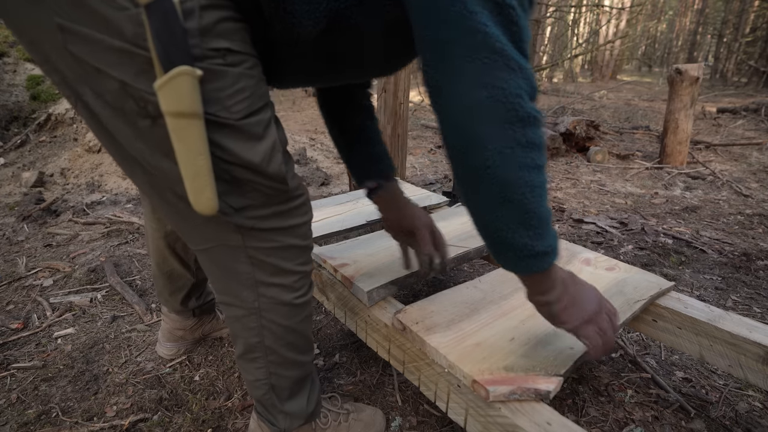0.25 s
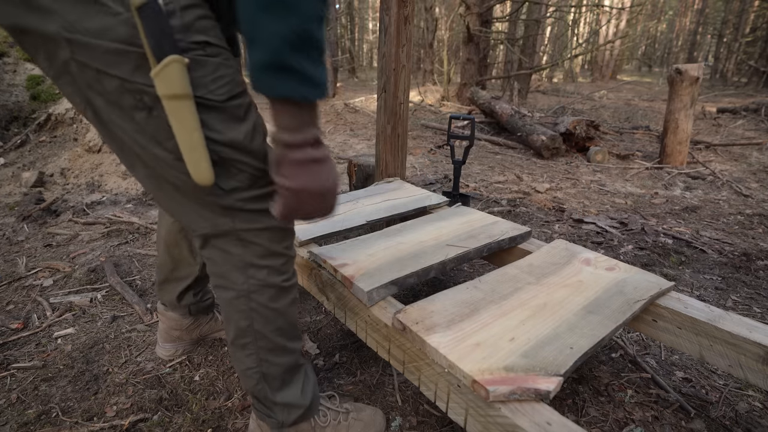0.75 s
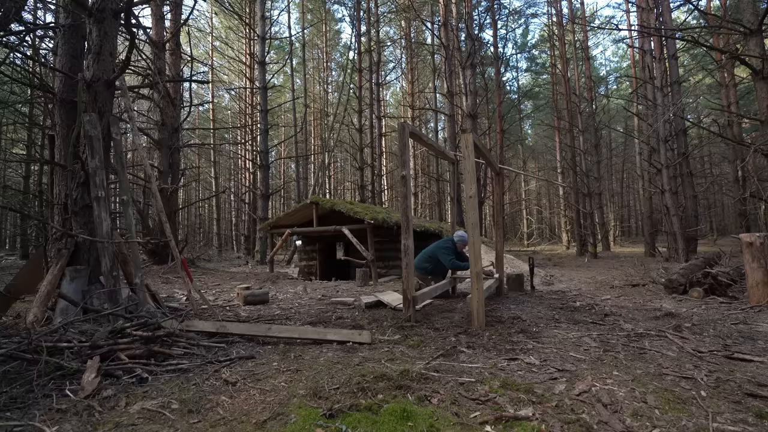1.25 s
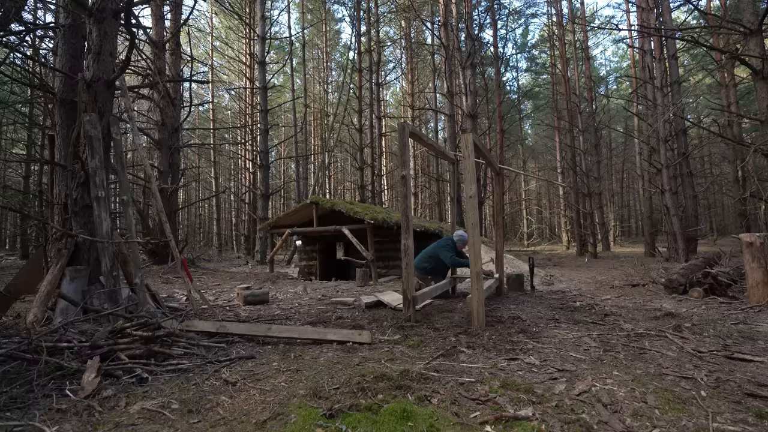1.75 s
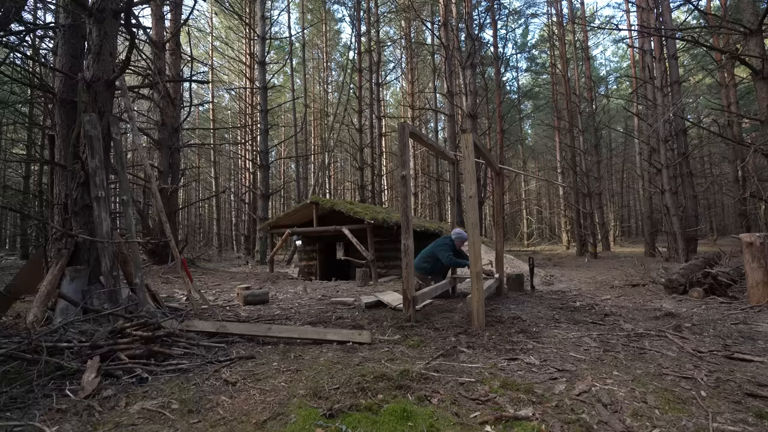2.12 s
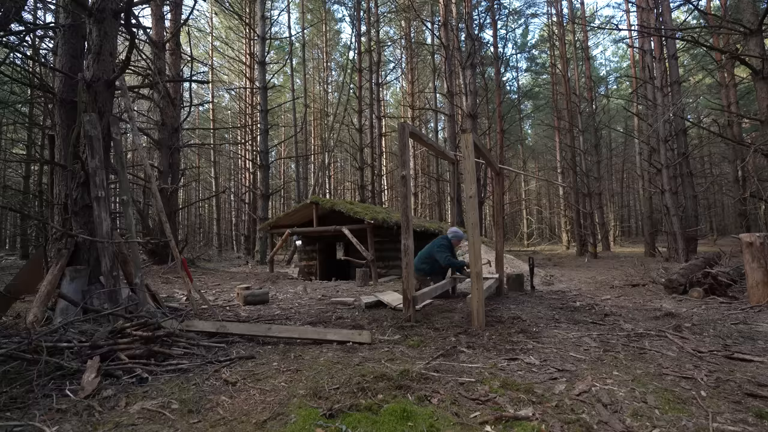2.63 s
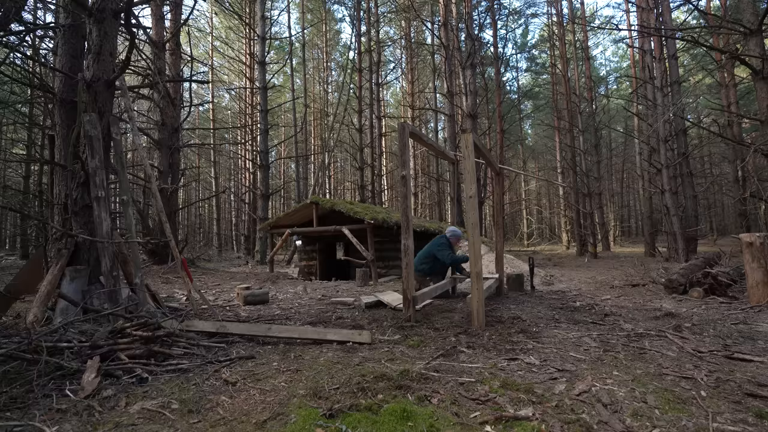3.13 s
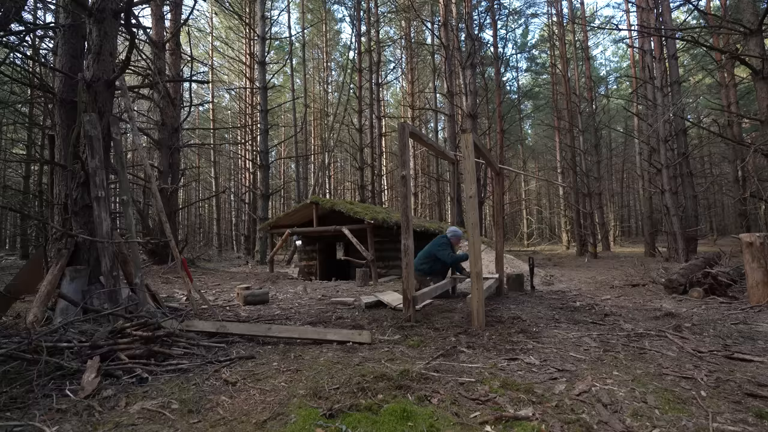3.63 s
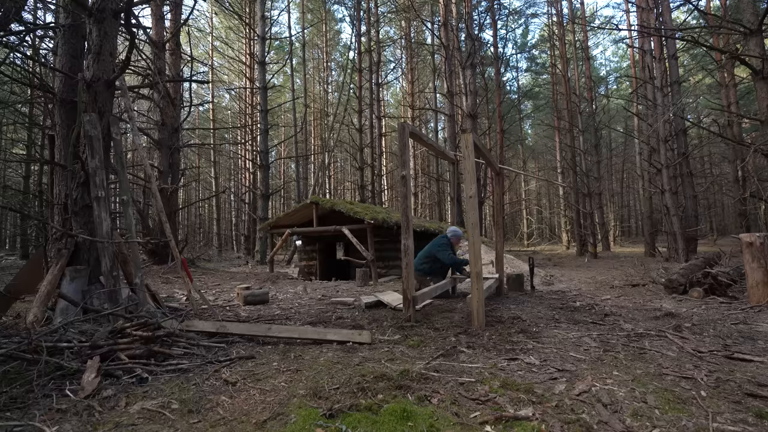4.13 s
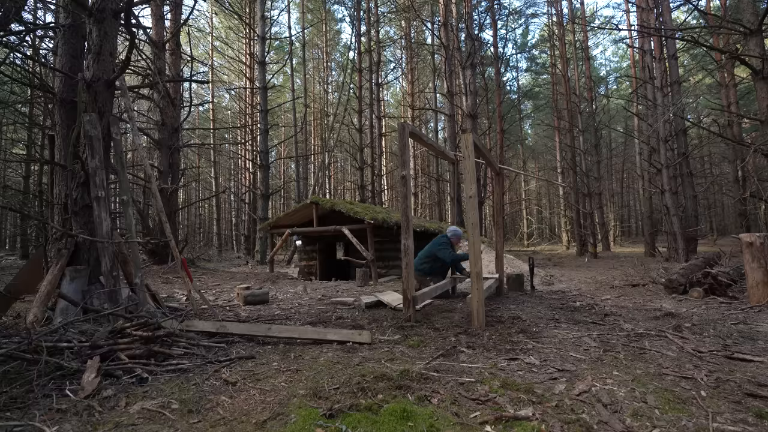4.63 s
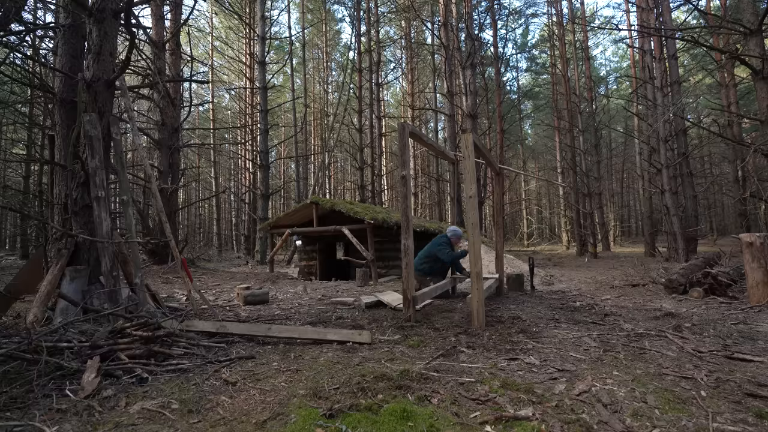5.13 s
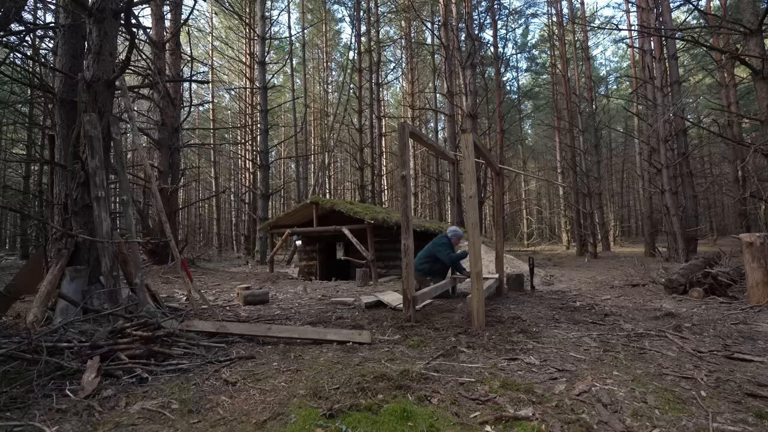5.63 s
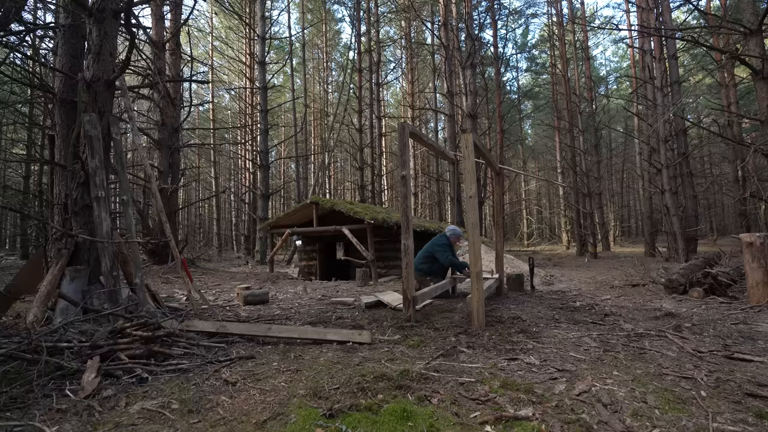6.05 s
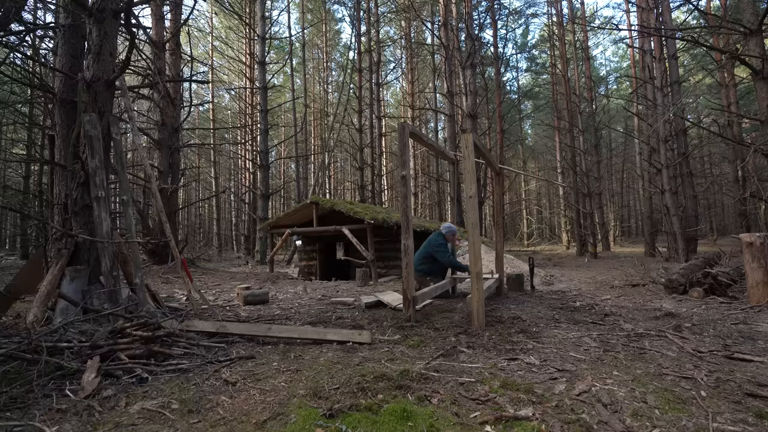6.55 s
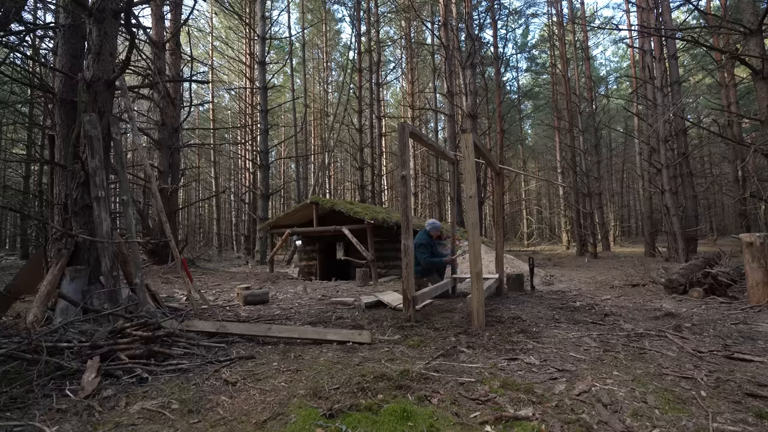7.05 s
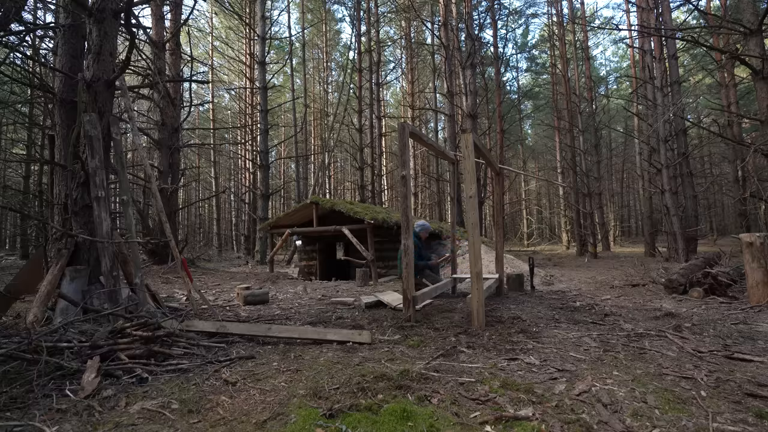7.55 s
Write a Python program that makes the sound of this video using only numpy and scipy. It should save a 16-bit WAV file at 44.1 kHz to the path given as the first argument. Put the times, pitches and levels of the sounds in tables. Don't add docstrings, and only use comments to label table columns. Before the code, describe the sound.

Hands nudge split boards on a wooden frame, then a steel hammer cracks out spaced blows, each echoing off trunks with a faint metallic ring.

```python
import sys
import numpy as np
from scipy import signal
from scipy.fft import rfft, irfft, next_fast_len
from scipy.io import wavfile
from scipy.ndimage import uniform_filter1d, map_coordinates

SR = 44100
rng = np.random.default_rng(int(sys.argv[2]) if len(sys.argv) > 2 else 0)


def digitize_waveform(pressure):
    field = np.atleast_2d(pressure).T
    bounded = np.clip(field, -1, 1)
    quanta = np.round(bounded * 32767).astype(np.int16)
    wavfile.write(sys.argv[1], SR, quanta)


def attenuation_scalar(level_db):
    decades = np.asarray(level_db, float) / 20
    return 10 ** decades


N = 343087

# time_s, buffet_db
WIND = [
    [(0, -63), (.25, -67), (.65, -66.5), (1.222, -68)],
    [(1.23, -49), (1.74, -44.5), (1.85, -56), (3.55, -59), (3.58, -53), (4.09, -70), (4.15, -61),
     (4.42, -69), (4.55, -55), (4.91, -71), (5.04, -53), (5.46, -66), (5.55, -55), (5.83, -62.5),
     (6.74, -51.5), (6.87, -59), (7.47, -52), (7.78, -56)],
]
# freq_hz, density_db_per_hz
RUMBLE = [(12, -32), (20, -2), (70, -4.5), (82, -15.5), (105, -20.5), (200, -44), (260, -78), (440, -120)]
# freq_hz, density_db_per_hz
AIR = [(41, -33), (70, -10.5), (300, -8), (641, -15), (1050, -22), (1730, -27), (3050, -27.5), (15700, -29),
       (15900, -70)]
AIR_DB = -60.5

# time_s, busy_db
RUSTLE = [(0, -22), (.26, -6), (.37, -2), (.52, -2), (.66, -0.5), (1.1, -.5), (1.225, -1)]
# time_s, scrape_db, sleeve_db, spread_s
NUDGES = [
    (0, -71, -98, 0.017),
    (.108, -61, -58.5, 0.043),
    (.282, -53, -62, 0.0055),
    (.68, -65, -73, 0.028),
    (.855, -57, -76, 0.014),
    (1.0, -63, -70, 0.01),
    (1.118, -55, -62, 0.0088),
    (1.187, -49, -56, 0.0011),
    (1.2, -64, -66, 0.002),
    (1.222, -50, -53, 0.0006),
]
# freq_hz, density_db_per_hz
SCRAPE = [(88, -26), (130, -5.5), (284, -16), (361, -9), (563, -4), (2000, -16.5), (2600, -47),
          (4400, -120)]
# freq_hz, density_db_per_hz
SLEEVE = [(710, -22), (1200, -5), (2570, -5), (4430, -6), (7650, -12.5), (14100, -15.5), (15500, -18)]
CLOSE_END_S = 1.2232
SCRAPE_DB, SLEEVE_DB = -56.5, -58.5
SCRAPE_FOLLOWS, SLEEVE_FOLLOWS = 3.2, 0.51

# start_s, peak_db, pitch_hz, t60_s
TICKS = [(.0634, -47.5, 5000, .01), (1.0546, -48, 4500, .01), (.0972, -52, 1550, .012),
         (.2793, -45, 1900, .014), (.821, -52, 1000, .012), (.842, -50, 1300, .012),
         (1.136, -42, 3500, 0.017), (1.1842, -50, 4800, .008), (1.2211, -56, 2500, .006),
         (1.7255, -24, 3400, .008), (1.7258, -29, 7000, 0.0065), (5.4955, -19, 8900, 0.0055),
         (1.1985, -45, 6000, .015), (1.7655, -50, 11000, .008), (1.7805, -50, 9000, .006),
         (1.9007, -50, 4520, 0.0072), (2.5462, -51, 4500, .006), (2.7348, -52, 4600, .006),
         (2.749, -56, 4200, .006), (3.4317, -56, 4200, .02), (5.3195, -46, 4500, .006),
         (5.335, -49, 4800, .006), (5.4896, -37, 5540, .006), (5.5285, -42, 11930, .008),
         (6.0015, -29, 6000, 0.0044), (7.7203, -45, 2900, .007), (7.7208, -43, 1400, .008),
         (7.7205, -62, 8500, .006), (7.7529, -55, 8300, .01)]
# start_s, peak_db, pitch_hz, t60_s, puff_db
TAPS = [
    (0.279, -50, 574, 0.034, 5),
    (0.844, -48, 555, 0.041, 10),
    (1.115, -41, 700, 0.03, -1),
    (1.123, -44, 800, 0.025, -4),
    (1.1945, -28, 672, 0.021, -19),
    (1.197, -37.5, 210, 0.047, -12),
    (2.108, -32.5, 960, 0.035, -9),
    (2.141, -29.5, 1480, 0.047, -26),
    (7.503, -45, 530, 0.031, -11),
    (7.603, -65, 439, 0.035, 2),
]
# start_s, peak_db, pitch_hz, t60_s, puff_db
REBOUND = [
    (2.681, -24, 338, 0.018, -13),
    (2.6824, -30.5, 2110, 0.012, -14),
    (5.529, -15, 1870, 0.034, -23),
    (5.529, -11, 1600, 0.017, -31),
    (5.529, -17, 1310, 0.023, -25),
    (5.529, -16, 1110, 0.029, -24),
]
# start_s, peak_db, pitch_hz, t60_s, puff_db
PINGS = [(1.741, -50, 15300, 0.04, -40), (1.7655, -47, 15700, .05, -30), (1.7805, -47, 15600, .09, -30),
         (1.7805, -55, 8000, .07, -40), (2.06, -58, 15600, .11, -40)]
# start_s, peak_db, pitch_hz, t60_s, puff_db
THUMPS = [(2.037, -27, 604, 0.068, -30), (3.05, -27.5, 192, .1, -30), (3.05, -30.5, 313, 0.096, -30),
          (4.132, -26.5, 417, 0.11, -30), (4.131, -32, 492, .06, -30), (3.0505, -26, 1070, 0.066, -30),
          (6.601, -23, 465, 0.098, -30), (1.728, -23, 900, .05, -30), (4.52, -26, 1150, .04, -30),
          (4.52, -28, 225, .1, -30), (6.602, -30, 267, .08, -30), (5.535, -42, 1860, .35, -30),
          (6.02, -50, 2450, .4, -30), (4.52, -28, 760, 0.056, -30), (6.012, -33, 276, 0.069, -30)]

# start_s, first_touch_lead_s
STRIKES = [(1.7248, .002), (2.0345, .004), (2.6864, .005), (3.0469, .004), (4.1283, .003), (4.5156, .004),
           (4.9817, .004), (5.4946, .0045), (6.0058, .0045), (6.5984, .0045)]
# crack_db, touch_db, touch_brightness_hz, ground_bounce_db
BLOWS = [
    (-9.5, -42, 1300, -6.5),
    (-6, -26, 860, -2.5),
    (-33.5, -47, 3100, -18),
    (-6, -36, 1300, -2.5),
    (-2.5, -41, 1100, -3),
    (-2.5, -24.5, 1250, -8),
    (-9, -23.5, 2200, 2.5),
    (-8.5, -30, 4200, -3),
    (-14.5, -27.5, 4400, -1.5),
    (-11, -18, 4000, -2.5),
]
# body_db, clack_db, bite_db, edge_db
FACE = [(1, 6, -0.5, 5.5), (6.5, -2.5, 0.5, -4), (-6, 0, 3, -15), (5, -9, -2, 3), (-6.5, -8, -8, -15),
        (5, 1.5, 4.5, 13), (-8, 1, 6.5, 17), (-16, -4, 12.5, 11), (3, 2, 19, 25), (-1, -0.5, 8.5, 13.5)]
BODY_HZ, CLACK_HZ, BITE_HZ, EDGE_HZ = 1550, 2440, 6660, 10650
# pitch_hz, level_db
NAIL = [(8420, 14.5), (2060, 8), (5800, 13), (2800, 15), (2770, 16.5), (3000, 6.5), (6900, 9.5),
        (4110, 11.5), (6940, 3.5), (3040, 12.5)]
# freq_hz, level_db
STEEL = [(200, -6), (800, -28), (1400, 6), (3000, 4.5), (4500, 6.5), (7000, -1.5), (9500, -1), (15500, -13)]
# chatter_db, chatter_s, post_delay_s, post_db
AFTER = [(-18, 0.0037, 0.012, -21), (-16.5, 0.0037, 0.013, -24), (-21, .004, .012, -30),
         (-24.5, 0.009, 0.0085, -29), (-24, 0.0058, .012, -22), (-25, 0.0047, .011, -28),
         (-25, 0.004, 0.013, -21), (-25, 0.0042, .0115, -26), (-29, 0.0067, 0.0113, -17),
         (-18, 0.0056, 0.01, -27)]
BOUNCE_HZ = 5000

# pitch_hz, level_db, t60_s
WOOD = [(175.2, -12.5, 0.19), (220, -2, 0.13), (232.3, 0.5, 0.14), (276.4, -11.5, 0.32), (341, 0, 0.21),
        (433, -5.5, 0.097), (498.2, -3, 0.099), (615, -32.5, 0.048), (675, -14, 0.15), (749, 10.5, 0.028),
        (839, 5, 0.055), (1055, -0.5, 0.064), (1087, 6.5, 0.039), (1216, -7, 0.066)]
# knock_db, tilt_db_per_octave, spot_along_board (0-1), main_mode_db
KNOCKS = [(-23, 0.5, 0.14, 3), (-27.5, -1, 0.19, 2.5), (-51.5, -3, 0.33, -1), (-29.5, 4, 0.5, -13),
          (-26, -2.5, 0.3, -2), (-26.5, 1, .5, -18), (-28, 1.5, 0.28, -2), (-30, 4, 0.14, 9.5),
          (-34, -1.5, .33, -16), (-26, 3.5, 0.22, -3)]
BASS = [-1.5, -2, -4, 0, -5, 2, 0.5, 0, -1.5, -1]
# level_db, pitch_hz, t60_s, rail_hum_db
POLES = [(-45, 43, .5, 2), (-40, 89, 0.42, 5), (-55, 140, 0.36, -5), (-44, 140, .5, -4),
         (-50, 190, 0.54, -1), (-48, 61, 0.45, -1), (-36.5, 120, 0.43, -5), (-39.5, 138, 0.58, 7.5),
         (-34, 139, 0.55, -0.5), (-32.5, 139, 0.42, -4)]
# pitch_hz, level_re_pole_db, t60_s
RAILS = [(338.5, -12, 0.24), (496, -11.5, 0.61), (698, -18, 1.17), (914, -11.5, 0.36), (1078, -13.5, 0.43)]
MAIN_MODE = 4
SPOT_DB = 3.5

# pole_db, board_db, steel_db, treble_shadow_db, treble_limit_hz
ECHOES = [(-32, -49, -57, 0, 16500), (-41, -44, -41.5, -6, 9300), (-64, -86, -71, -2, 9900),
          (-45.5, -43.5, -46, -7, 9800), (-40.5, -55, -45.5, -21, 11000), (-44.5, -38, -36.5, -3, 13500),
          (-42, -40, -37.5, -4.5, 16500), (-40.5, -47, -47, 3, 9400), (-40, -52, -45.5, -2, 18000),
          (-38.5, -38, -38.5, -2, 8600)]
SHELF = [-16, -16, -40, -25, -30, -16, -30, -5.5, -16, -4]
# pitch_hz, level_db, overtone_hz, overtone_db
CLANGS = [(4000, 11, 8500, 6), (4250, -1, 9500, 3.5), (5000, 0, 9000, 0), (4800, 6.5, 10700, 15.5),
          (4930, 5, 8400, 20), (5000, 0.5, 14000, 0.5), (6450, 2, 11500, 3), (4240, 13, 8300, 10.5),
          (7000, 11.5, 13800, 11), (5000, -1, 16000, 0)]
SHADE_HZ = 5450
CLANG_WIDE = 0.35
# freq_hz, level_db_per_octave
POLE_ECHO = [(40, -43), (110, 0), (240, -12.5), (450, -17), (900, -21), (2000, -60)]
# freq_hz, level_db_per_octave
BOARD_ECHO = [(100, -43), (200, -9), (450, -8), (1000, 1), (2200, -4.5), (4000, -3), (8000, -50)]
# freq_hz, level_db_per_octave
STEEL_ECHO = [(500, -50), (1000, -32), (2200, -10), (3200, -3), (4300, 0), (5300, -0.5), (8500, 0.5),
              (16500, -3.5)]
# pitch_hz, width_hz, level_db
BOARD = [(342, 90, 3), (474, 22, 4.5), (677, 100, 0), (880, 36, -1), (1095, 17, -1), (1427, 18, 6),
         (1830, 190, 0), (2380, 47, 3), (2850, 230, 3.5)]
# pitch_hz, level_db, second_hz, second_db
VOICE = [(700, 1, 1800, -5.5), (700, -0.5, 1800, 1.5), (700, 0, 2000, 0), (760, 1, 2300, -2),
         (700, 3, 1900, 0), (800, -2, 1600, 2.5), (1080, 3.5, 2100, 1.5), (700, 1, 1860, 7.5),
         (1290, 0, 2200, 4), (910, -3.5, 2200, 3.5)]
# pitch_hz, level_db, second_hz, second_db
LINGER = [(950, 3, 1250, 3), (335, 6, 2360, 5), (330, 5, 800, 3), (600, 3.5, 800, 1.5), (1060, 4, 1150, 3),
          (1054, 5.5, 800, 4.5), (1860, 6, 680, 3), (1350, 5, 500, 2), (1150, 3, 820, 6), (1150, 5, 650, 6)]
LINGER_WIDE_HZ = 34.3
# freq_hz, t60_s
FOREST = [(140, 0.52), (400, 0.56), (1000, 0.78), (2200, 0.9), (4300, 0.61), (8500, 0.38), (12000, 0.3),
          (15500, 0.25)]
# freq_hz, build_s
SWELL = [(150, 0.021), (1000, 0.028), (2500, 0.1), (5000, 0.079), (9000, 0.084), (15000, 0.061)]
# freq_hz, share (0-1)
GAP = [(500, 1), (1300, 0.62), (3000, 0.64), (7000, 0.88), (14000, 0.89)]
# freq_hz, level_db
FAR = [(140, -61), (500, -6), (1300, -14), (2200, -18), (3200, -22), (6000, -27)]
DEEP = [0, 1, 0, 1, -0.5, 1, 0, -1, 1, 2.5]
REACH = [0.51, 0.91, .8, 0.91, 0.71, 1.01, 1.005, 0.94, 1.02, 0.99]

# blow_s, peak_db, crest_delay_s, fall_db_per_s, flutter_per_s
HEAD = [
    (1.7248, -67.5, 0.089, 25, 1.3),
    (2.0345, -49.5, 0.15, 30, 10.5),
    (3.0469, -64, 0.16, 20, 14),
    (4.1283, -72.5, 0.18, 69, 11),
    (4.5156, -48.5, .14, 42, 10.7),
    (4.9817, -46.5, 0.14, 37, 8.7),
    (5.496, -43, 0.12, 30, 9.7),
    (6.0058, -57.5, 0.12, 23.5, 9),
    (6.5984, -55.5, 0.12, 37, 17.5),
]
SWING = [6, 3, 3, 8, 22, 24, 28, 16, 12]
EARLY = [0.59, 0.2, 0.51, 0.52, 0.086, 0.14, 0.15, .2, .3]
# flutter_s, stifled_by_hand_after_s
HUSH = [(0.27, 0.25), (0.22, 0.31), (0.24, 0.46), (.3, .3), (0.35, 0.39), (0.27, 0.41), (0.23, 0.33),
        (0.24, 0.48), (0.27, 0.29)]
# time_s, level_db, spread_s
SHIMMER = [(1.794, -6, .02), (1.854, -5, .015), (2.516, -3, .015), (2.65, -12, .01), (2.76, -11, .03),
           (2.9, -8, .03), (3.101, 8, 0.018), (3.179, -6, .01), (3.243, -9, .01), (3.295, -6, .012),
           (4.167, 7, .02), (4.584, -8, .02), (4.61, 9, .015), (4.753, -9, .012), (4.777, 4.5, .012),
           (5.068, 6, .012), (5.22, -2, 0.0089), (5.24, -6, 0.0074), (5.27, 3, .015), (5.709, -8, .01),
           (5.74, 0, 0.0066), (5.986, -7, .012), (6.078, 8, .012), (6.216, -7, .007), (6.284, -9, .018),
           (6.739, -10, .012), (6.797, -2, .011), (6.87, 5, 0.017), (6.95, -6, .011), (6.996, -6, 0.014),
           (7.048, 6, .02)]
HEAD_HZ, SING_RISE_S, LIFT_S, FLUTTER = 7393, 0.099, 0.4, 0.75
STIFLE_DB_PER_S, STIFLE_S = 70, 0.087

# freq_hz, density_db_per_hz
HISS = [(100, -5), (8000, -7), (15700, -7), (15900, -78)]
HISS_DB = -67.5
# freq_hz, level_db
TOP_END = [(15750, 0), (15950, -14), (16500, -24), (16950, -34), (17050, -90)]


def unit(x):
    return x / np.sqrt(np.mean(x ** 2) + 1e-20)


def along(points, hz):
    f, v = np.transpose(points)
    return np.interp(np.log(hz + 1), np.log(f + 1), v)


def curve(points):
    s, v = np.transpose(points)
    return np.interp(np.arange(N) / SR, s, v)


def wobble(rate):
    return map_coordinates(rng.standard_normal(int(N * rate / SR) + 4), [np.arange(N) * rate / SR])


def filtered(x, response):
    m = 2 * next_fast_len(x.shape[-1] // 2 + 2048)
    return irfft(rfft(x, m) * response(np.fft.rfftfreq(m, 1 / SR)), m)[..., :x.shape[-1]]


def lowpass(hz, corner):
    return 1 / (1 + 1j * hz / corner)


def highpass(hz, corner):
    return 1j * hz / (corner + 1j * hz)


def resonance(hz, centre, half_width):
    return 1 / (1 + ((hz - centre) / half_width) ** 2)


def causal(gain):
    cepstrum = irfft(np.log(gain + 1e-6))
    cepstrum[1:len(cepstrum) // 2] *= 2
    cepstrum[len(cepstrum) // 2 + 1:] = 0
    return np.exp(rfft(cepstrum))


def decay(t, t60):
    return attenuation_scalar(-60 * t / t60)


def build_up(t, tau):
    return 1 - np.exp(-t / tau)


def sine(hz, t, phase=0):
    return np.sin(2 * np.pi * hz * t + phase)


def rush(spectrum):
    return unit(filtered(rng.standard_normal(N), lambda hz: attenuation_scalar(along(spectrum, hz))))


def burst(t, hold, t60, spiky=1):
    shape = (t >= 0) * decay(np.maximum(t - hold, 0), t60)
    noise = rng.standard_normal(len(t))
    noise = shape * np.sign(noise) * np.abs(noise) ** spiky
    return noise * np.linalg.norm(shape) / np.linalg.norm(noise)


def add(track, s, sound):
    part = track[round(s * SR):][:len(sound)]
    part += sound[:len(part)]


def air():
    puffs = rush(RUMBLE)
    puffs = puffs / np.sqrt(np.abs(uniform_filter1d(puffs ** 2, size=SR // 6)) + .05)
    treetops = attenuation_scalar(AIR_DB + 0.36 * wobble(3.1)) * rush(AIR)
    return treetops + attenuation_scalar(curve(WIND[0] + WIND[1]) + 1.2 * wobble(10)) * puffs


def rustle():
    track, t = np.zeros(N), np.arange(round(CLOSE_END_S * SR)) / SR
    busy_db = curve(RUSTLE)[:len(t)]
    scrape = attenuation_scalar(SCRAPE_DB + SCRAPE_FOLLOWS * busy_db)
    sleeve = attenuation_scalar(SLEEVE_DB + SLEEVE_FOLLOWS * busy_db)
    for s, scrape_db, sleeve_db, spread in NUDGES:
        bump = np.exp(-((t - s) / spread) ** 2)
        scrape = scrape + attenuation_scalar(scrape_db) * bump
        sleeve = sleeve + attenuation_scalar(sleeve_db) * bump
    boards = attenuation_scalar(1.5 * wobble(25) + 1.6 * wobble(110)) * rush(SCRAPE)
    cloth = attenuation_scalar(0.69 * wobble(68.4)) * rush(SLEEVE)
    add(track, 0, scrape * boards[:len(t)] + sleeve * cloth[:len(t)])
    return track


def ticks():
    track, t = np.zeros(N), np.arange(SR // 40) / SR
    for s, db, hz, t60 in TICKS:
        band = lambda f: 1j * f * 0.61 * hz / (hz * hz - f * f + 1j * f * 0.51 * hz)
        add(track, s, attenuation_scalar(db + 3.5) * filtered(burst(t, 0.00033, t60), band))
    return track


def taps():
    track, t = np.zeros(N), np.arange(SR // 8) / SR
    for s, db, hz, t60, puff_db in [*TAPS, *REBOUND, *PINGS, *THUMPS]:
        ring = sine(hz, t) * decay(t, t60) * build_up(t, 0.0031)
        puff = filtered(burst(t, 0.00033, t60 * .5), lambda f: highpass(f, hz) * lowpass(f, 3 * hz))
        add(track, s, attenuation_scalar(db) * (ring + attenuation_scalar(puff_db) * puff))
    return track


def first_touch(lead, db, corner):
    t = np.arange(SR // 40) / SR
    dull = filtered(burst(t, lead, 0.012), lambda hz: highpass(hz, 400) * lowpass(hz, corner) ** 4)
    return attenuation_scalar(db) * np.sqrt(SR / corner) * 0.68 * dull


def crack(face, bounce_db, nail_hz, nail_db, chatter_db, chatter_s, post_s, post_db):
    t = np.arange(SR // 16) / SR
    snap = .6 * burst(t, .0008, .003, 1.6)
    bounce = .7 * burst(t - .0016, .0005, .003, 1.6)
    snap[0], bounce[round(.0018 * SR)] = 4, -3.5
    snap = filtered(snap, lambda hz: lowpass(hz, 9000))
    ground = lambda hz: (0.32 * BOUNCE_HZ + 1j * hz) / (BOUNCE_HZ + 1j * hz)
    snap += attenuation_scalar(bounce_db) * filtered(bounce, ground)

    power = uniform_filter1d(np.abs(rfft(snap)) ** 2, size=70)
    power_at = lambda hz: np.interp(hz, np.fft.rfftfreq(len(t), 1 / SR), power)
    snap = filtered(snap, lambda hz: causal(np.sqrt(power.mean() / power_at(hz))))
    snap += attenuation_scalar(post_db) * filtered(burst(t - post_s, 0.00076, .004), lambda hz: lowpass(hz, 9000))
    snap += attenuation_scalar(chatter_db) * burst(t, chatter_s, 0.018)

    body_db, clack_db, bite_db, edge_db = face

    def steel(hz):
        colour_db = along(STEEL, hz) + body_db / (1 + (hz / BODY_HZ) ** 4)
        colour_db += clack_db * resonance(hz, CLACK_HZ, 620) + bite_db * resonance(hz, BITE_HZ, 1180)
        colour_db += edge_db / (1 + (EDGE_HZ / (hz + 1)) ** 8) + nail_db * resonance(hz, nail_hz, 176)
        return causal(attenuation_scalar(colour_db) * hz ** 2 / (hz ** 2 + 130 ** 2))

    return filtered(snap, steel)


def knock(db, tilt_db, spot, drum_db, bass_db, pole_db, pole_hz, pole_t60, hum_db):
    t = np.arange(SR) / SR
    ring = np.zeros(SR)
    for k, (hz, level, t60) in enumerate(WOOD):
        share_db = tilt_db * np.log2(hz / 500) + SPOT_DB * np.cos(2 * np.pi * k * spot)
        share_db += drum_db * (k == MAIN_MODE) + bass_db * (k < MAIN_MODE)
        ring += attenuation_scalar(db + level + share_db) * decay(t, t60) * sine(hz, t, rng.uniform(0, 2 * np.pi))
    thud = filtered(burst(t, 0.0024, 0.074), lambda f: highpass(f, 200) * lowpass(f, 900) ** 2)
    board = (ring + 1.1 * np.abs(ring).max() * thud) * build_up(t, 0.0073)
    pole = attenuation_scalar(pole_db + 5) * decay(t, pole_t60) * sine(pole_hz, t) * build_up(t, 0.081)
    rails = sum(attenuation_scalar(pole_db + hum_db + level) * decay(t, t60) * sine(hz, t) for hz, level, t60 in RAILS)
    return board + pole + rails * build_up(t, 0.0078)


def sent(f, pole_db, board_db, steel_db, shade_db, top_hz, shelf_db, *clang):
    ring_db = sum(db * resonance(f, hz, hz * CLANG_WIDE / 2) for hz, db in (clang[:2], clang[2:]))
    shadow_db = shade_db / (1 + (SHADE_HZ / (f + 1)) ** 20)
    steel = attenuation_scalar(steel_db + along(STEEL_ECHO, f) + shadow_db + ring_db)
    steel = steel * np.hypot(1 / np.sqrt(1 + (f / top_hz) ** 20), attenuation_scalar(shelf_db))
    pole, board = attenuation_scalar(pole_db + along(POLE_ECHO, f)), attenuation_scalar(board_db + along(BOARD_ECHO, f))
    return np.hypot(np.hypot(pole, board), steel)


def echoes(colour, reach, voice, deep_db, linger):
    hz, t, z = signal.stft(rng.standard_normal(SR + SR // 2), SR, nperseg=256)
    t, hz = t / reach, hz[:, None]
    dying_db = -60 * t / along(FOREST, hz)
    thickening = 1 - along(GAP, hz) * np.exp(-(t / along(SWELL, hz)) ** 2)
    distant = attenuation_scalar(deep_db + along(FAR, hz) + 0.34 * dying_db)
    clumps = uniform_filter1d(rng.standard_normal(z.shape), size=12, axis=0)
    clumps = attenuation_scalar(0.74 * unit(uniform_filter1d(clumps, size=4, axis=1)))
    wash = signal.istft(z * thickening * np.hypot(attenuation_scalar(dying_db), distant) * clumps, SR, nperseg=256)[1]

    tones = [*BOARD]
    for c, db in (voice[:2], voice[2:]):
        tones.append((c, .5 * c, db))
    for c, db in (linger[:2], linger[2:]):
        tones.append((c, LINGER_WIDE_HZ, db))

    def radiated(f):
        tone_db = sum(db * resonance(f, c, width / 2) for c, width, db in tones)
        return sent(f, *colour) * attenuation_scalar(tone_db + 6.5) * np.sqrt(SR / 2 / (f + 50))

    wash = filtered(wash, radiated)
    return wash * build_up(np.arange(len(wash)) / SR, 0.00073)


def hammer():
    track = np.zeros(N)
    for i, (s, lead) in enumerate(STRIKES):
        db, touch_db, touch_hz, bounce_db = BLOWS[i]
        add(track, s - lead, first_touch(lead, touch_db, touch_hz))
        add(track, s, attenuation_scalar(db - 6.5) * crack(FACE[i], bounce_db, *NAIL[i], *AFTER[i]))
        add(track, s, knock(*KNOCKS[i], BASS[i], *POLES[i]))
        colour = [*ECHOES[i], SHELF[i], *CLANGS[i]]
        add(track, s, echoes(colour, REACH[i], VOICE[i], DEEP[i], LINGER[i]))
    return track


def head():
    level, sag = np.zeros(N), np.zeros(N)
    for (s, db, crest, fall_db, rate), drop, early, (fade, hush) in zip(HEAD, SWING, EARLY, HUSH):
        start = round(s * SR)
        t = np.arange(min(N - start, SR)) / SR
        swell = 1 - (1 - early) * np.exp(-(t / SING_RISE_S) ** 2)
        depth = FLUTTER * np.exp(-(t / fade) ** 3)
        flutter = np.abs(1 + depth * np.exp(2j * np.pi * rate * (t - crest)))
        stifled_db = STIFLE_DB_PER_S * np.clip(t - hush, 0, STIFLE_S)
        song = attenuation_scalar(db + 7 - fall_db * (t - crest) - stifled_db) * swell * flutter
        level[start:][:len(t)] = song
        sag[start:][:len(t)] = drop * np.minimum(t / LIFT_S, 1) ** 3
    time = np.arange(N) / SR
    level *= attenuation_scalar(sum(db * np.exp(-((time - s) / spread) ** 2) for s, db, spread in SHIMMER))
    pitch_hz = HEAD_HZ - sag + 4 * wobble(25) + 5 * wobble(70)
    tone = np.sin(2 * np.pi * np.cumsum(pitch_hz) / SR)
    return uniform_filter1d(level, size=200) * attenuation_scalar(.8 * wobble(30) + .6 * wobble(80)) * tone


def scene():
    mono = air() + rustle() + ticks() + taps() + hammer() + head()
    apart = attenuation_scalar(-63.5) * wobble(45) * filtered(mono, lambda hz: lowpass(hz, 600))
    hiss = attenuation_scalar(HISS_DB + 2.5) * np.array([rush(HISS), rush(HISS)])
    return mono + np.array([apart, -apart]) + hiss


def top_cut(x):
    return signal.sosfilt(signal.butter(12, 16990, fs=SR, output="sos"), x)


def record(dry):
    limited = dry / (1 + np.abs(dry / .3) ** 4) ** (1 / 4)
    mix = filtered(limited, lambda hz: attenuation_scalar(along(TOP_END, hz)))
    return top_cut(mix)


dry = scene()
out = record(dry)
digitize_waveform(out)
```